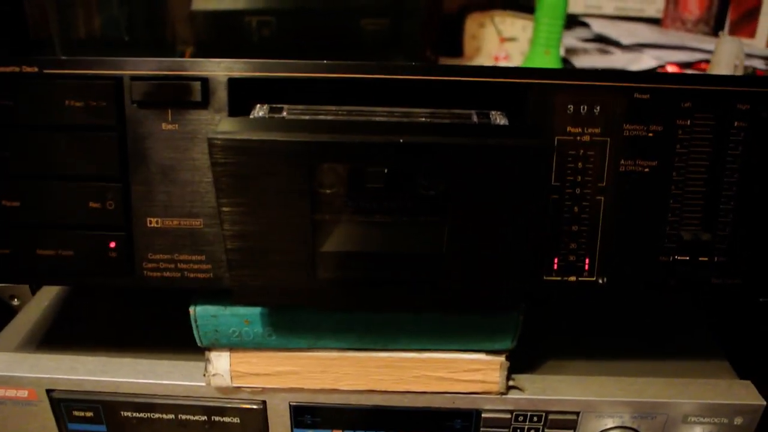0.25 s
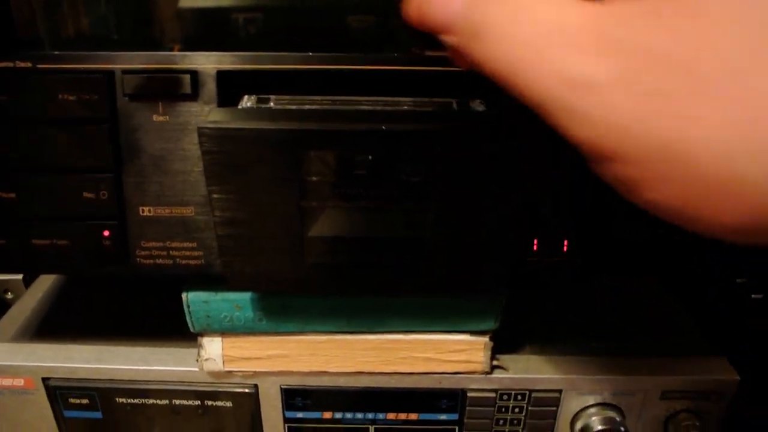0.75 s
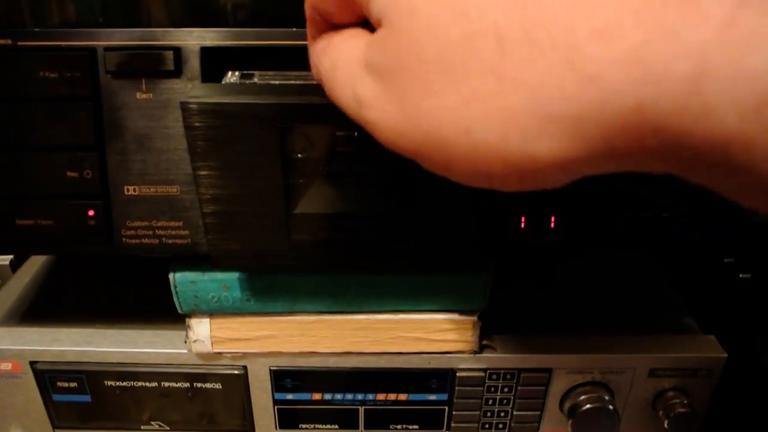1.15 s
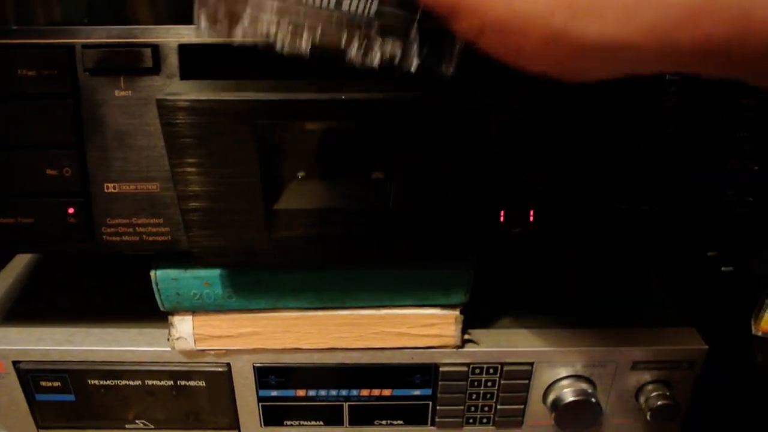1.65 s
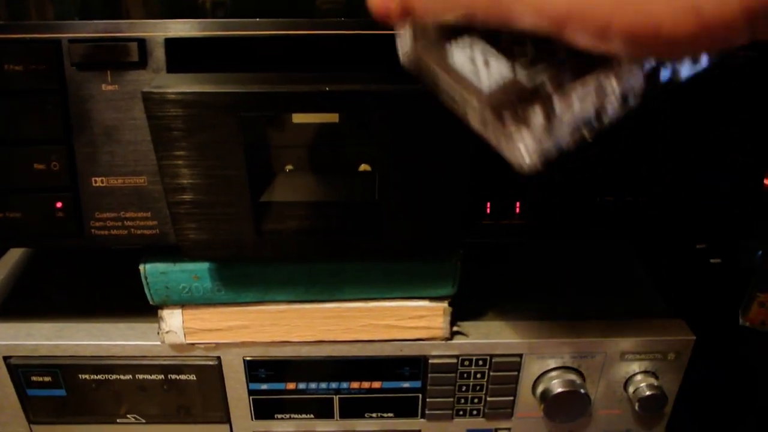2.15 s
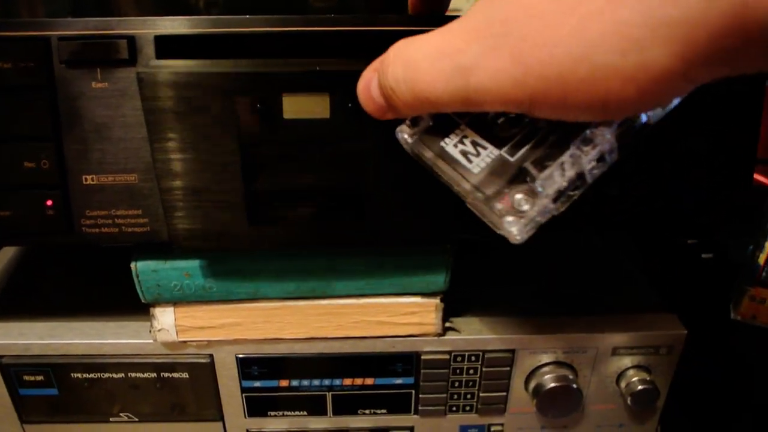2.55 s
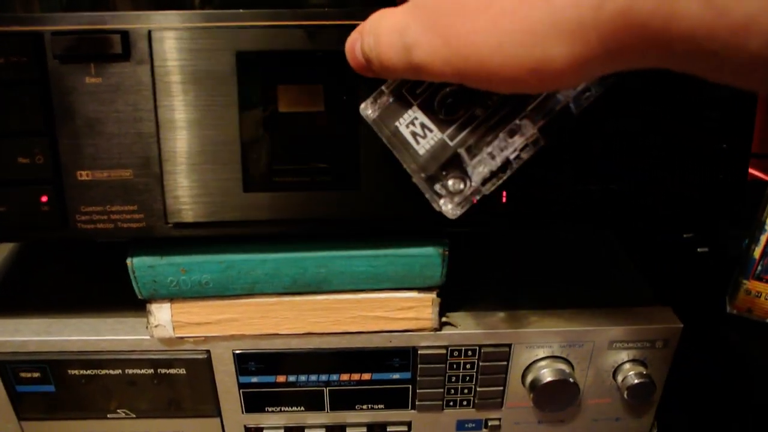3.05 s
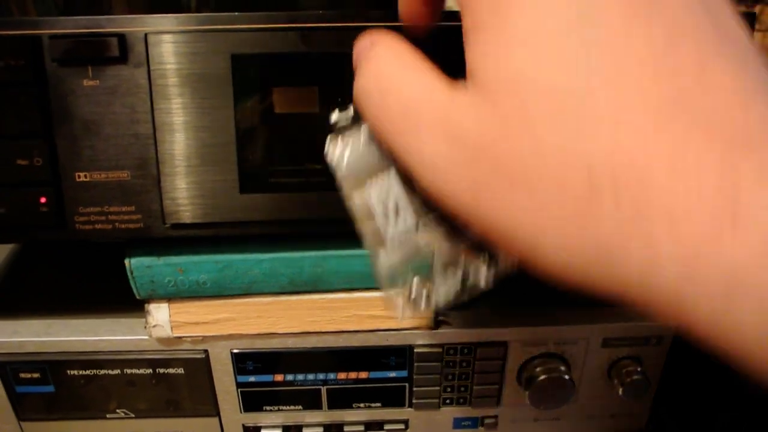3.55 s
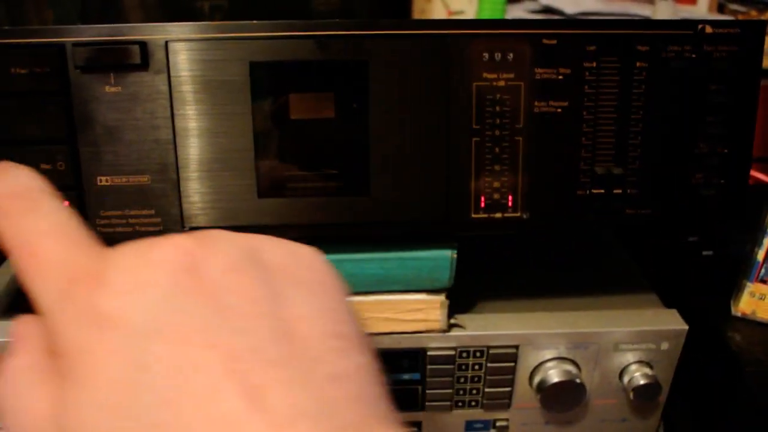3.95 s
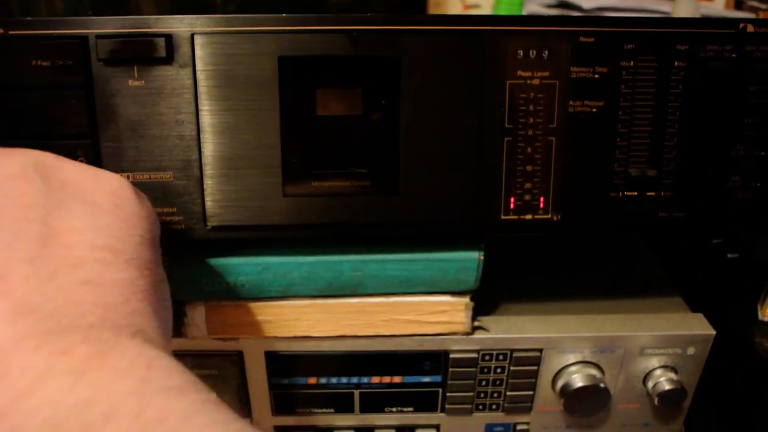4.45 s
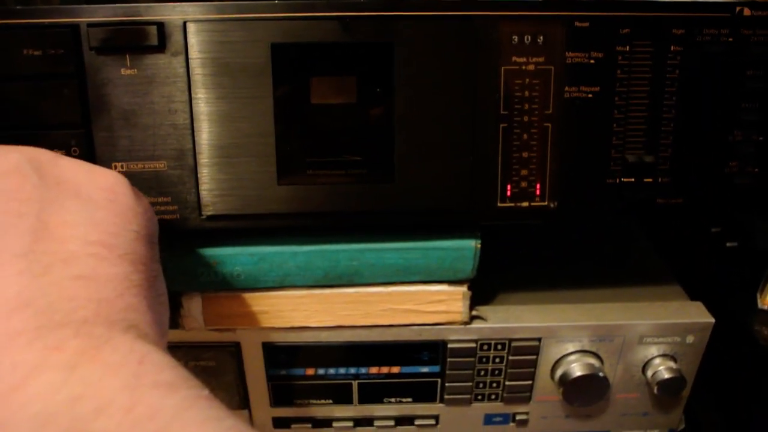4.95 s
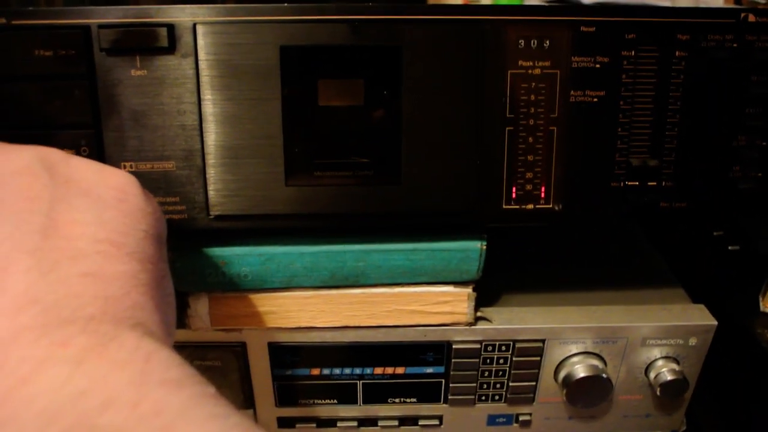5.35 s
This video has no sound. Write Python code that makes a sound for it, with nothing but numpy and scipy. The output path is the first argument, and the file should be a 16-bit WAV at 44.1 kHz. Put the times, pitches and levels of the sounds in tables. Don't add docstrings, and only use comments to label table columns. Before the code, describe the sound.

In a quiet furnished room with steady soft hiss, fingers lightly touch a tape deck, then a cassette shell knocks, scrapes along its guides and jerks free with a sharp clack. Bright clicks follow as it is turned. The deck door snaps shut very loudly with a hollow thud and thin spring ringing. After a pause, one key clicks, the hand rubs dully, and a second key snaps. Close stereo microphones.

```python
import sys
import numpy as np
from scipy import signal
from scipy.fft import rfft, irfft, next_fast_len
from scipy.io import wavfile
from scipy.ndimage import uniform_filter1d

SR = 44100
rng = np.random.default_rng(int(sys.argv[2]) if len(sys.argv) > 2 else 0)


def undo_db(level):
    steps = np.asarray(level, float) / 20
    return 10 ** steps


def output_pcm(signal):
    pcm = np.clip(np.atleast_2d(signal).T, -1, 1) * 32767
    wavfile.write(sys.argv[1], SR, np.round(pcm).astype(np.int16))


N = 247091
EDGE_HZ, AIR_HZ = 3800, 17500

# [f/Hz, width/Hz, level/dB]
CASE_MODES = [(172, 68, -16), (276, 26, -1), (291, 87, 2), (488, 46, -0.5), (494, 21, -7)]
# [f/Hz, width/Hz, level/dB]
PANEL_MODES = [(306, 33, 3), (486, 31, 9), (546, 25, -13)]
# [f/Hz, width/Hz, level/dB]
DRAG_MODES = [(890, 61, 3), (1096, 140, 7), (1356, 81, 7), (2100, 270, 0.5), (3180, 120, -16),
              (10200, 1400, -3)]
# [t/s, crack/dB, body/dB, thud/dB, chatter t60/s]
SETTLE_HITS = [
    (3.3340, -50, -28, -38, .016),
    (3.3395, -62, -29, -39, .022),
]


def band(x, lo_hz, hi_hz):
    return signal.sosfilt(signal.butter(3, [lo_hz, hi_hz], "band", fs=SR, output="sos"), x)


def ring(x, modes, detune):
    out = 0
    for (hz, width_hz, db), ratio in zip(modes, detune):
        radius = np.exp(-np.pi * max(width_hz, hz / 25) / SR)
        angle = 2 * np.pi * hz * ratio / SR
        poles = [1, -2 * radius * np.cos(angle), radius ** 2]
        out = out + undo_db(db) * (1 - radius) * signal.lfilter([1, 0, -1], poles, x)
    return out


def to_peak(x, db):
    return x * undo_db(db) / np.sqrt(uniform_filter1d(np.mean(x ** 2, axis=0), 88).max())


def lagged(x, lag_samples):
    delay = np.array([[2.], [2 + lag_samples]])
    turn = np.exp(-2j * np.pi * np.fft.rfftfreq(x.shape[1]) * delay)
    return irfft(rfft(x) * turn, x.shape[1])


def fall(t, t60_s):
    return np.exp(-np.log(1000) * t / max(t60_s, .003))


def log_curve(rows, hz):
    at_hz, value = np.transpose(rows)
    return np.interp(np.log(hz), np.log(at_hz), value)


def taps(rows, thud_db, t60_s):
    return [(s, crack_db, body_db, body_db + thud_db, t60_s) for s, crack_db, body_db in rows]


def knocks(events, modes, case, pan_db, lag, plain_db, apart, tick, buzz_db):
    out, t = np.zeros((2, N + SR)), np.arange(8400) / SR
    strike = np.sin(np.pi * np.minimum(t / .00012, 1))
    for s, crack_db, body_db, thud_db, t60_s in events:
        burst_db = 1.5 * np.repeat(rng.exponential(size=len(t) // 24), 24)
        grit = rng.standard_normal((5, len(t))) * undo_db(burst_db)
        force = (fall(t, t60_s) + tick * fall(t, 0.0017)) * np.minimum(t / 0.00068, 1)
        shared, own = grit[0] * force + 3 * tick * strike, grit[1:3] * force
        detune = 1 + 0.0036 * rng.standard_normal(len(modes))
        crack_force, body_force = shared + apart * own, shared + 0.37 * own
        crack = to_peak(ring(crack_force, modes, detune), 0) + to_peak(crack_force, plain_db)
        body = to_peak(ring(body_force, modes, detune), 0) + to_peak(body_force, plain_db)
        push = 40 * tick * strike + (grit[0] + 0.033 * grit[1:3]) * fall(t, 1.37 * t60_s)
        thud = ring(push, case, 1 + 0.012 * rng.standard_normal(len(case)))
        buzz = band(grit[3:] + .5 * grit[0], 1400, AIR_HZ) * fall(t, 0.16) * np.minimum(t / 0.014, 1)
        hit = to_peak(band(crack, EDGE_HZ, AIR_HZ), crack_db - 2.5)
        hit = hit + to_peak(band(body, 467, EDGE_HZ), body_db - 1)
        hit = hit + to_peak(band(thud, 28, 1620), thud_db + 2.0)
        hit = hit + to_peak(buzz, crack_db + buzz_db)
        start = int((s + .001) * SR)
        out[:, start:start + len(t)] += lagged(hit, lag) * undo_db(np.array([[pan_db], [-pan_db]]) / 2)
    return out[:, :N]


def pull_out():
    # [t/s, crack/dB, body/dB, thud/dB, chatter t60/s]
    grip_hits = [
        (1.2285, -34.5, -34.5, -48, 0.03),
        (1.2878, -45, -27, -51, .045),
        (1.3255, -26, -21, -52, 0.053),
        (1.3511, -49, -60, -44, 0.022),
    ]
    # [t/s, crack/dB, body/dB, thud/dB, chatter t60/s]
    pull_hits = [
        (1.6702, -22.5, -17.5, -38.5, 0.061),
        (1.6990, -11, -15, -35.5, 0.02),
        (1.7040, -16, -25.5, -47, 0.045),
        (1.7205, -23, -41, -45, .018),
    ]
    # [t/s, crack/dB, body/dB]
    drag_taps = [
        (1.521, -54, -41.5),
        (1.577, -40, -52),
        (1.5832, -45, -28),
        (1.5885, -47, -36),
        (1.602, -32, -35.5),
        (1.6205, -45, -36),
        (1.629, -52, -41),
        (1.637, -50, -38.5),
    ]
    # [f/Hz, width/Hz, level/dB]
    grip_modes = [(1060, 400, -5), (1410, 100, 7), (1970, 100, 2), (2330, 220, 6), (2550, 100, 4),
                  (5660, 1100, -5), (7150, 1000, -5), (12500, 900, -16)]
    # [f/Hz, width/Hz, level/dB]
    pull_modes = [(943, 120, 5.5), (1270, 65, 10), (1800, 190, 4), (2250, 59, 1), (3360, 130, 0),
                  (4040, 980, -2), (7300, 390, -6), (10300, 2700, -4), (12600, 620, 2.5)]
    out = knocks(grip_hits, grip_modes, CASE_MODES, -1.6,
                 lag=1.0, plain_db=-3, apart=0.6, tick=0.12, buzz_db=-35)
    out += knocks(taps(drag_taps, thud_db=-20, t60_s=.021), DRAG_MODES, CASE_MODES, -1.1,
                  lag=.2, plain_db=-5, apart=.6, tick=.45, buzz_db=-18)
    out += knocks(pull_hits, pull_modes, CASE_MODES, -.1,
                  lag=.1, plain_db=4.0, apart=0.95, tick=0.6, buzz_db=-30)
    return out


def turn_over():
    # [t/s, crack/dB, body/dB]
    turn_taps = [
        (1.8224, -13.5, -31.5),
        (1.8262, -25, -32),
        (1.8292, -27, -39),
    ]
    # [t/s, crack/dB, body/dB]
    flip_taps = [
        (2.0012, -28.5, -46),
        (2.1001, -15, -41),
        (2.1088, -21.5, -42),
    ]
    # [t/s, crack/dB]
    loose_ticks = [(2.2996, -44), (2.3886, -44), (2.578, -45), (3.6651, -37.5), (5.2738, -41.5),
                   (5.3034, -41.5), (5.338, -56), (5.5366, -35.5)]
    # [f/Hz, width/Hz, level/dB]
    turn_modes = [(1770, 130, 0), (2860, 110, 11), (3480, 130, -5), (4200, 220, 1), (5040, 310, -3.5),
                  (7550, 1100, 0.5), (9100, 770, -2), (11000, 930, -1)]
    # [f/Hz, width/Hz, level/dB]
    flip_modes = [(1980, 150, 16.5), (2370, 140, 16.5), (3080, 88, 1), (4660, 400, 2), (5940, 340, 1),
                  (7600, 1100, 3.5), (10500, 1200, 0.5), (12400, 700, -21)]
    tick_taps = [(s, db, db - 6.5) for s, db in loose_ticks]
    out = knocks(taps(turn_taps, thud_db=-42, t60_s=.014), turn_modes, CASE_MODES, -.6,
                 lag=-.1, plain_db=-22.0, apart=0.47, tick=0.45, buzz_db=-24.0)
    out += knocks(taps(flip_taps, thud_db=-28, t60_s=0.016), flip_modes, CASE_MODES, -4.5,
                  lag=-1.27, plain_db=-12.0, apart=0.52, tick=0.26, buzz_db=-38)
    out += knocks(taps(tick_taps, thud_db=-10, t60_s=.016), flip_modes, CASE_MODES, -.6,
                  lag=-0.69, plain_db=26.0, apart=1.0, tick=0.6, buzz_db=-32)
    return out


def shut_door():
    # [t/s, crack/dB, body/dB, thud/dB, chatter t60/s]
    shut_hits = [
        (3.1020, -4, -16.5, -53, 0.012),
        (3.1030, -2.5, -32, -41, 0.014),
        (3.1075, -17, -18, -27, 0.045),
    ]
    # [f/Hz, width/Hz, level/dB]
    shut_modes = [(929, 31, 5.5), (1340, 45, 13), (1980, 69, 0), (2540, 350, 1.5), (3220, 61, -14),
                  (5370, 630, -5), (7350, 720, -0.5), (9900, 1100, -1.5), (13300, 2900, -2.5)]
    # [f/Hz, width/Hz, level/dB]
    settle_modes = [(930, 70, -13), (1100, 80, -20), (1365, 55, 0), (1930, 90, -20)]
    # [f/Hz, width/Hz, level/dB]
    door_modes = [(60.4, 80, -16), (272, 12, 3), (305.5, 20, 3), (463, 40, -2), (535, 30, -5),
                  (630, 40, -20)]
    out = knocks(shut_hits, shut_modes, door_modes, 0.59,
                 lag=1.38, plain_db=-3.5, apart=1.0, tick=0.56, buzz_db=-21)
    out += knocks(SETTLE_HITS, settle_modes, door_modes, -1.5,
                  lag=.9, plain_db=-40, apart=.5, tick=1.5, buzz_db=-18)
    return out


def press_keys():
    # [t/s, crack/dB, body/dB, thud/dB, chatter t60/s]
    first_hits = [
        (5.0682, -15, -26, -50, .014),
        (5.0702, -21.5, -33, -48, .08),
        (5.088, -36, -42, -43, .13),
    ]
    # [t/s, crack/dB, body/dB, thud/dB, chatter t60/s]
    last_hits = [
        (5.5571, -6, -17, -65, 0.0054),
        (5.5598, -16, -21.5, -47, 0.05),
        (5.5635, -14.5, -22, -51, 0.06),
        (5.581, -24.5, -30, -41.5, 0.087),
    ]
    # [t/s, thud/dB]
    lean_steps = [
        (5.4101, -43.5),
        (5.4399, -49),
        (5.4691, -50),
    ]
    # [f/Hz, width/Hz, level/dB]
    first_modes = [(838, 31, 5), (2030, 220, 3), (3070, 380, 2.5), (4600, 500, -1.5), (6900, 700, -24),
                   (11000, 640, 6), (13900, 820, -9)]
    # [f/Hz, width/Hz, level/dB]
    last_modes = [(870, 43, 10.5), (1000, 73, 6), (2210, 200, 9.5), (2730, 390, 7.5), (3320, 390, -11),
                  (4600, 570, -15), (8200, 700, -8), (10600, 760, 2), (13000, 1100, -12)]
    # [f/Hz, width/Hz, level/dB]
    shelf_modes = [(60, 50, -6), (175.6, 40, 5), (261, 60, 0), (440, 90, -3), (580, 60, -7)]
    lean_hits = [(s, -48, -49.5, thud_db, 0.047) for s, thud_db in lean_steps]
    out = knocks(first_hits, first_modes, CASE_MODES, 1.5,
                 lag=2.04, plain_db=1.5, apart=0.64, tick=0.99, buzz_db=-22.0)
    out += knocks(last_hits, last_modes, PANEL_MODES, 0.86,
                  lag=2.7, plain_db=-1.0, apart=1.0, tick=0.78, buzz_db=-37)
    out += knocks(lean_hits, last_modes, shelf_modes, -.3,
                  lag=.2, plain_db=11.0, apart=0.67, tick=0.038, buzz_db=-10)
    return out


def touch_deck():
    # [t/s, crack/dB, body/dB, thud/dB, chatter t60/s]
    touch_hits = [
        (1.0367, -42.5, -35.5, -49, 0.055),
        (1.0556, -44, -45.5, -44, 0.048),
    ]
    # [t/s, crack/dB, body/dB, thud/dB, chatter t60/s]
    nudge_hits = [
        (2.8475, -54, -43, -46, .04),
        (2.862, -56, -48, -48, .035),
    ]
    # [f/Hz, width/Hz, level/dB]
    touch_modes = [(900, 48, 9), (880, 31, 14), (1070, 49, 10), (1110, 37, -19), (1960, 150, -8),
                   (5700, 500, -17)]
    out = knocks(touch_hits, touch_modes, CASE_MODES, -.2,
                 lag=0.82, plain_db=-9, apart=0.76, tick=0.31, buzz_db=-9)
    out += knocks(nudge_hits, touch_modes, PANEL_MODES, -1.3,
                  lag=1.0, plain_db=-20, apart=.6, tick=0.18, buzz_db=-14)
    return out


def slide(t):
    # [from/s, to/s, final level/dB, rise/dB]
    strokes = [(1.07, 1.231, -46, 14), (1.3, 1.33, -39, 11), (1.368, 1.584, -38.5, 13.5),
               (1.572, 1.69, -40.5, -6.5), (1.745, 1.832, -36.5, 26), (1.84, 1.988, -40, 6),
               (1.98, 2.105, -31.5, 15), (2.12, 2.24, -45.5, 14), (5.397, 5.538, -42, 14)]
    treble, middle = np.zeros(N), np.zeros(N)
    for start, end, db, rise_db in strokes:
        to_go = np.clip((end - t) / (end - start), 0, 1)
        edge = np.clip(np.minimum(t - start, end - t) / 0.005, 0, 1) * undo_db(db - 4.5)
        treble += edge * undo_db(-rise_db * to_go)
        middle += edge * undo_db(-7.5 - rise_db * to_go)
    patches = uniform_filter1d(np.repeat(rng.standard_normal(N // 300 + 1), 300)[:N], 200)
    grit = rng.standard_normal((3, N)) * undo_db(1.5 * rng.exponential(size=N) + 2.6 * patches)
    grit = grit[0] + 1.26 * grit[1:]
    shell = ring(grit, DRAG_MODES, np.ones(len(DRAG_MODES)))
    high = band(grit, EDGE_HZ, AIR_HZ) + 0.2 * band(grit, 8300, AIR_HZ)
    mid = band(shell / shell.std() + 2.9 * grit / grit.std(), 1260, EDGE_HZ)
    return treble * high / high.std() + middle * mid / mid.std()


def spring(t):
    # [f/Hz, level/dB, t60/s]
    partials = [(4156, -51, 1.8), (4161, -61, 1.5), (4947, -64, .9)]
    after = np.maximum(t - 3.104, 0)
    out = sum(undo_db(db) * np.sin(2 * np.pi * hz * after) * fall(after, t60_s) for hz, db, t60_s in partials)
    stop = np.clip((SETTLE_HITS[0][0] + .02 - t) / .12 + .8, 0, 1)
    return out * stop * np.minimum(.4 + after / .2, 1)


def squeaks(t):
    # [t/s, f/Hz, level/dB, length/s]
    rubs = [
        (2.928, 1596, -53, 0.016),
        (3.023, 1624, -59, .02),
        (5.235, 1615, -58.5, 0.027),
    ]
    judder = 1 + 8 * uniform_filter1d(rng.standard_normal(N), 200)
    out = np.zeros(N)
    for s, hz, db, length_s in rubs:
        out += undo_db(db) * judder * np.sin(2 * np.pi * hz * t) * np.exp(-((t - s) / length_s) ** 2)
    return out


def room(dry):
    t = np.arange(22000) / SR
    noise = rng.standard_normal((3, len(t)))
    low = band(noise[0] + 0.09 * noise[1:], 68, 730) * fall(t, 0.29) * undo_db(10.0)
    high = band(noise[1:] + 0.24 * noise[0], 1700, AIR_HZ) * fall(t, 0.26)
    tail = (low + high) * np.clip(t / 0.0025 - .3, 0, 1)
    tail = tail / np.sqrt(np.sum(tail[0] ** 2))
    return undo_db(-12) * signal.fftconvolve(tail, dry.mean(axis=0)[None])[:, :N]


def murmur():
    # [f/Hz, density/dB per Hz]
    colour = [(14, -48), (38, -6), (75, -13.5), (204, -6.5), (520, -5.5), (1000, -5.5), (1960, -9.5),
              (16000, -15.5)]
    # [f/Hz, share/0-1]
    likeness = [(30, 0.56), (200, 0.41), (800, 0.44), (2000, 0.17), (4000, 0), (16000, 0.14)]
    # [f/Hz, width/Hz, lift/dB]
    air_modes = [(220, 17, 3.5), (462, 28, 4.5), (597, 23, 6), (860, 106, 3)]
    size = next_fast_len(N)
    hz = np.fft.rfftfreq(size, 1 / SR) + 1
    colour_db = log_curve(colour, hz)
    for at_hz, width_hz, lift_db in air_modes:
        colour_db = colour_db + lift_db * np.exp(-((hz - at_hz) / width_hz) ** 2)
    alike = np.clip(log_curve(likeness, hz), 0, 1)
    mid, side = rfft(rng.standard_normal((2, size))) * undo_db(colour_db)
    mid = irfft(mid * np.sqrt(1 + alike), size)[:N]
    side = irfft(side * np.sqrt(1 - alike), size)[:N]
    flicker_db = 0.69 * uniform_filter1d(np.repeat(rng.standard_normal(N // 3000 + 1), 3000)[:N], 3000)
    gain = undo_db(-50 + flicker_db) / mid.std()
    return gain * np.array([undo_db(-1.43) * (mid + side), undo_db(-0.26) * (mid - side)])


def scene():
    t = np.arange(N) / SR
    dry = pull_out() + turn_over() + shut_door() + press_keys() + touch_deck()
    dry += slide(t) + spring(t) + squeaks(t)
    return dry + room(dry) + murmur()


def top_cut(x):
    return signal.sosfilt(signal.butter(12, 16440, fs=SR, output="sos"), x)


def record(dry):
    over = (np.abs(dry).max(axis=0) > .95).astype(float)
    held = signal.fftconvolve(over, np.ones(int(.228 * SR)))[:N] > .5
    dip_db = 2.5 * signal.lfilter(np.ones(400) / 400, [1], held)
    clipped = np.clip(dry * undo_db(-dip_db), -1, 1)
    mix = signal.sosfilt(signal.ellip(8, .2, 60, 15900, fs=SR, output="sos"), clipped)
    return top_cut(mix)


dry = scene()
out = record(dry)
output_pcm(out)
```